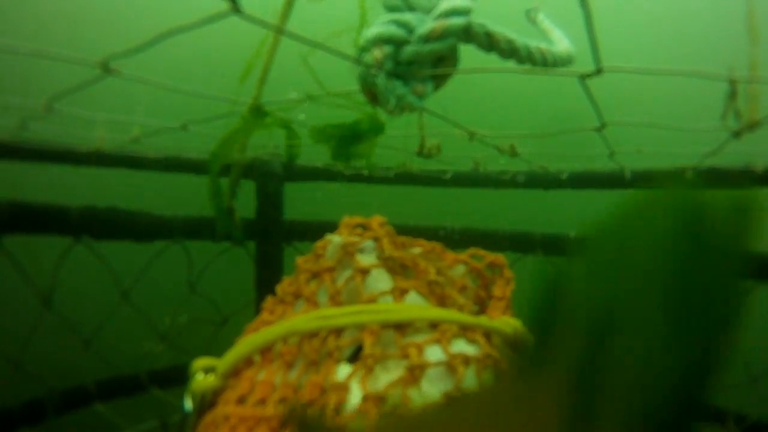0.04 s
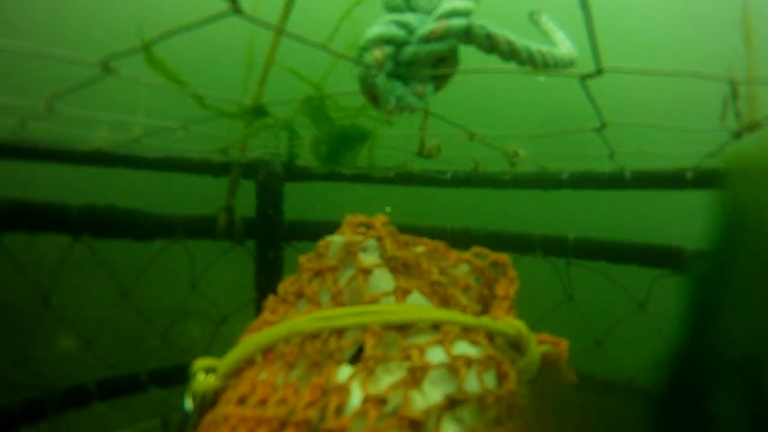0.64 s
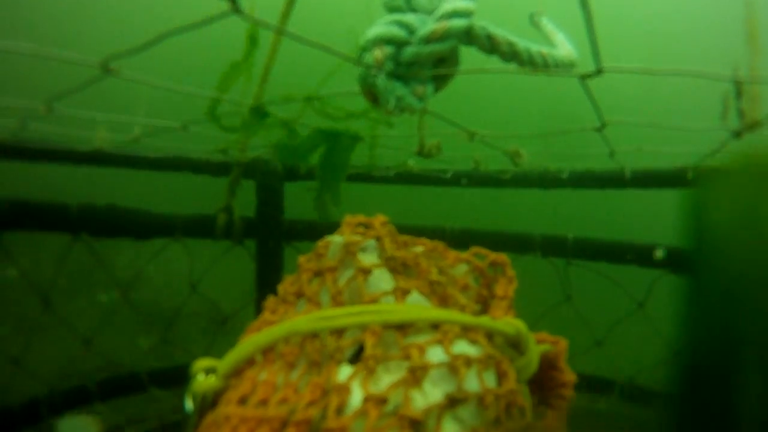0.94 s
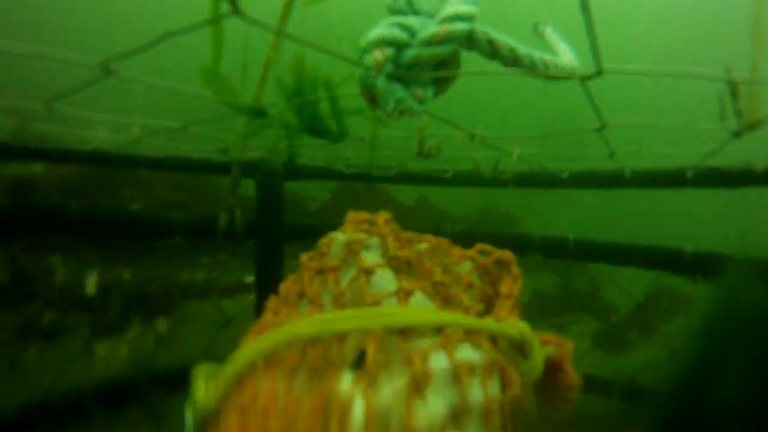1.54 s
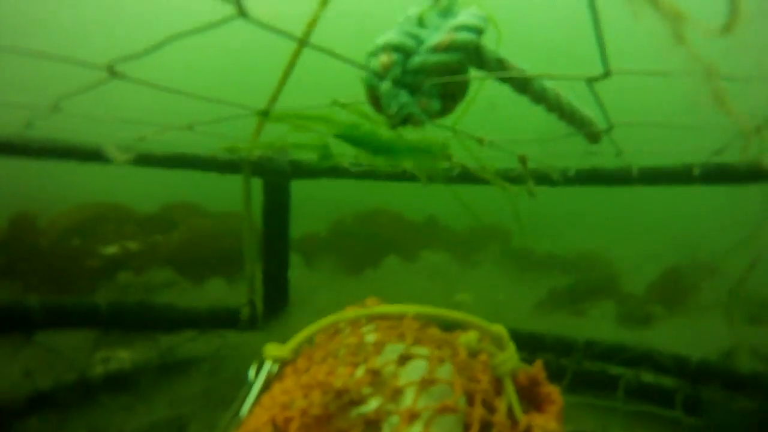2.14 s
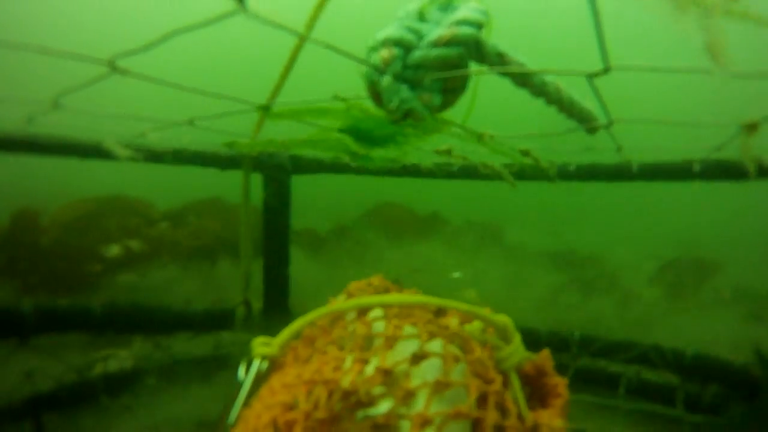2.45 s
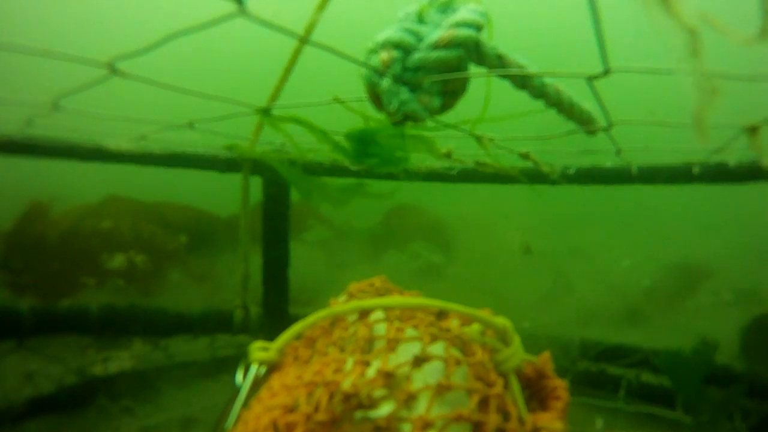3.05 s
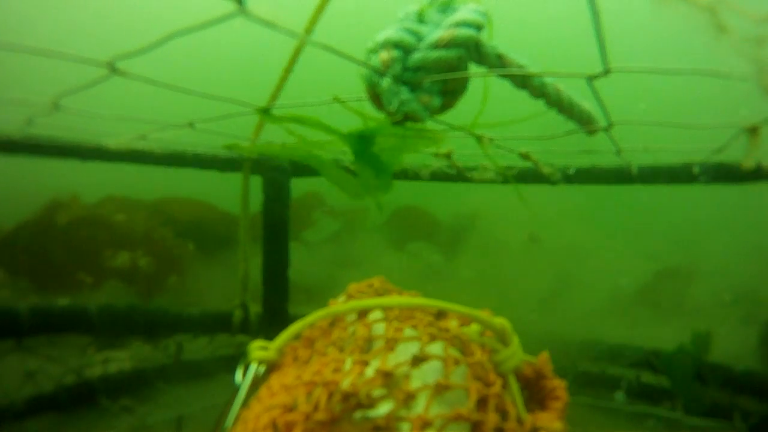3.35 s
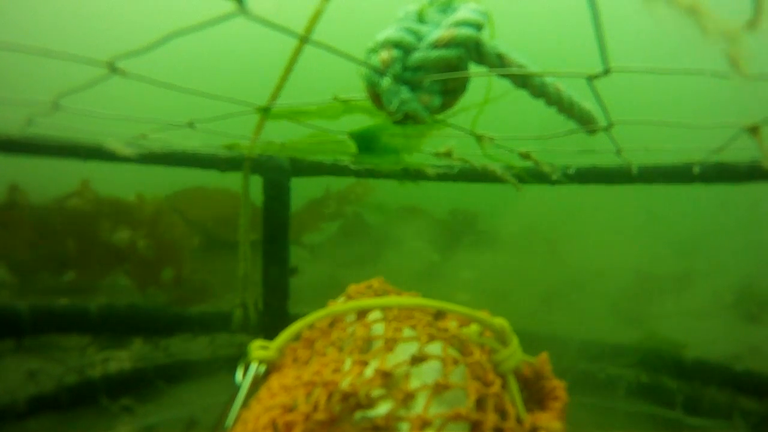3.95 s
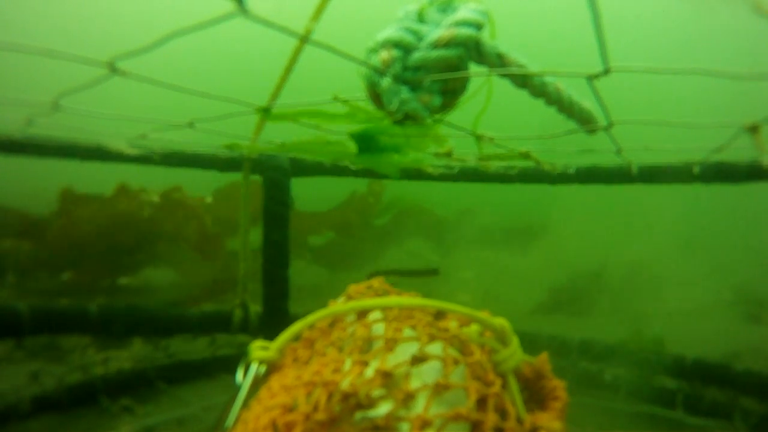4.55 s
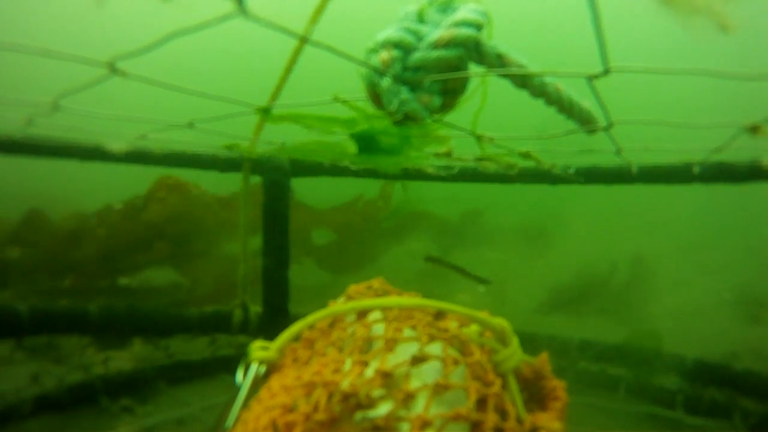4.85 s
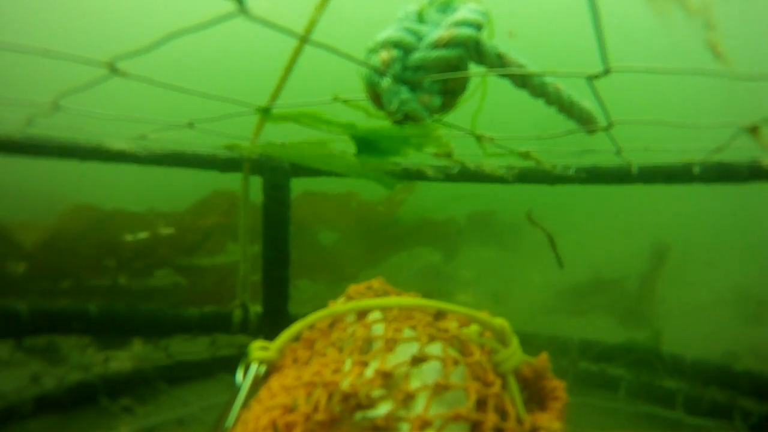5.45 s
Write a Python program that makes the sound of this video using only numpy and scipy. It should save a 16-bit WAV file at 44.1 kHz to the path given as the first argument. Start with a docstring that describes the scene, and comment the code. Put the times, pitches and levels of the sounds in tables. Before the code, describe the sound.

Heard underwater, a wire trap thuds and clatters onto a stony bottom over the low hum of an idling boat engine.

```python
"""A baited wire trap with a camera inside sinks while a boat's engine hums and clatters overhead.
On the way down, the seabed's echo sweeps a notch (a gap in pitch) upward through the clatter.
At about 1.7 s the frame lands with thuds, sharp clacks and a judder, then settles on crackling grit.
The engine idles on, fainter. Throughout, the camera samples slowly and holds each sample,
which mirrors the sound faintly into the treble."""
import sys
import numpy as np
from scipy import signal
from scipy.fft import rfft, irfft
from scipy.io import wavfile

SR = 44100
rng = np.random.default_rng(int(sys.argv[2]) if len(sys.argv) > 2 else 0)


def transcribe(u):
    """Save the signal u as a 16-bit wav file named by the first command-line argument.

    u: samples, shape (n,) or (channels, n), limited to [-1, 1]; the rate is SR.
    q: integer samples, one column per channel.
    """
    v = np.clip(np.atleast_2d(u).T, -1, 1)
    q = np.round(v * 32767).astype(np.int16)
    wavfile.write(sys.argv[1], SR, q)


N = 251370
TIME = np.arange(N) / SR
BIN_HZ = np.maximum(np.fft.rfftfreq(N, 1 / SR), 1)
LANDING_S, DRAG_END_S, CREEP_END_S = 1.66, 2.11, 2.62
STOPPING_S = 0.045  # how quickly the frame's movement dies away


def from_db(db):
    """Turn decibels into a factor to multiply by."""
    return 10 ** (np.asarray(db) / 20)


def rms_one(x):
    """Scale a sound to an average power of 1."""
    return x / np.sqrt(np.mean(np.abs(x) ** 2) + 1e-20)


def burst_one(x, length_s=0.0016):
    """Scale a burst to the energy of a short sine of height 1."""
    return x * np.sqrt(length_s * SR / 2 / np.sum(x ** 2))


def in_time(rows):
    """Join a table's timed points with straight lines, one curve per column."""
    times_s, *columns = np.transpose(rows)
    return [np.interp(TIME, times_s, column) for column in columns]


def swell(middle_s, length_s):
    """A smooth rise to 1 and fall around a moment."""
    return np.exp(-np.minimum((2 * (TIME - middle_s) / length_s) ** 2, 50))


def butter(x, hz, kind, order=2):
    """Keep the low part, the high part or one band of a sound."""
    return signal.sosfilt(signal.butter(order, hz, kind, fs=SR, output="sos"), x + 1e-18)


def noise(spectrum):
    """Noise of power 1, shaped by (pitch_hz, level_db) points."""
    hz, db = np.transpose(spectrum)
    gain = from_db(np.interp(np.log(BIN_HZ), np.log(hz), db))
    return rms_one(irfft(rfft(rng.standard_normal(N)) * gain, N))


def drift(rate_hz):
    """A smooth random wobble, about 1 in size."""
    return rms_one(butter(rng.standard_normal(N + SR), rate_hz, "low", order=3)[SR:])


def band(centre_hz, width_hz):
    """Noise of power 1, gathered around one pitch."""
    phase = 2 * np.pi * np.cumsum(np.full(N, centre_hz)) / SR
    return rms_one(drift(width_hz / 2) * np.cos(phase) + drift(width_hz / 2) * np.sin(phase))


def resonant_noise(modes):
    """Noise that rings around several pitches at once."""
    return sum(from_db(db) * band(hz, width_hz) for hz, width_hz, db in modes)


def ring(force, hz, fade_s):
    """Each click starts a tone that falls by 60 dB in fade_s."""
    decay, step = from_db(-60 / (fade_s * SR)), 2 * np.pi * hz / SR
    return signal.lfilter([0, np.sin(step)], [1, -2 * decay * np.cos(step), decay ** 2], force + 1e-18)


def push(t, hz):
    """The pressure of a soft blow: one peak between two dips."""
    spread = (np.pi * hz * t) ** 2
    return (1 - 2 * spread) * np.exp(-np.minimum(spread, 50))


def crunch(t, rise_s):
    """A contact breaks into many tiny slips within a few milliseconds."""
    return rng.standard_normal(len(t)) * (t / rise_s) * np.exp(1 - t / rise_s)


def hum_level(boat_db):
    """The main hum's level in dB flutters, and now and then swells or dips."""
    # brief swells and dips: middle_s, length_s, change_db
    surges = [(0.178, 0.095, -6), (0.424, 0.042, 3), (0.917, 0.082, 3.5), (1.232, 0.13, -6),
              (2.73, 0.23, -12.5), (2.992, 0.09, -22), (4.758, 0.056, -12), (4.847, 0.057, 5),
              (4.986, 0.075, -17), (5.247, 0.28, 3.5)]
    flutter_db = drift(rate_hz=7.4)
    return boat_db + flutter_db + sum(db * swell(s, length_s) for s, length_s, db in surges)


def engine_hum(firing_phase, boat_db, trim_db=0.5, waver_db=2.0):
    """The engine's firing makes a stack of wavering tones; the second is the main hum."""
    # engine tones: multiple of the firing rate, level_db
    tones = [(1, -13.5), (2, 0.5), (3, -16), (4, -19), (5, -23.5), (6, -33), (7, -31.5), (8, -27)]
    out = np.zeros(N)
    for multiple, db in tones:
        level_db = hum_level(boat_db) if multiple == 2 else boat_db + waver_db * drift(rate_hz=1.7)
        out += from_db(db + level_db) * np.sin(multiple * firing_phase + rng.uniform(0, 2 * np.pi))
    return np.sqrt(2) * from_db(trim_db) * out


def seabed_echo(x, echo_db=-4, sink_m_per_s=0.348, rest_height_m=0.051, sound_m_per_s=1500):
    """The echo returns ever sooner as the trap sinks, so the pitches it cancels slide upward."""
    height_m = rest_height_m + sink_m_per_s * np.maximum(LANDING_S - TIME, 0)
    delay_s = 2 * height_m / sound_m_per_s
    return x + from_db(echo_db) * np.interp(TIME - delay_s, TIME, x)


def engine_clatter(firing_phase, boat_db, clatter_db, wash_follows=0.55):
    """A low wash, a drone and three ringing bands of machine noise throb with each engine cycle."""
    # wash of engine noise in the water: pitch_hz, level_db
    wash_shape = [(20, -18.5), (34, -16.5), (44, 4), (65, 13.5), (110, 5.5), (170, 4), (235, -5.5),
                  (320, 1.5), (480, -2), (700, -8), (900, -23.5), (1100, -19), (2800, -24), (5600, -33)]
    # the boat's low drone comes and goes: middle_s, length_s, pitch_hz, level_db
    drone_swells = [(3.05, 1.3, 318.6, -52.5), (4.35, 0.32, 367.3, -48.5), (5.0, 3.3, 401.5, -55)]
    # ringing of the hull and of two higher bands: pitch_hz, width_hz, level_db
    hull_modes = [(612.4, 156, -8.5), (743.6, 137, -4.5), (831.5, 47.5, -5.5), (893, 29.3, -10.5),
                  (990, 62, -22.5), (1236, 81, -17.5)]
    middle_modes = [(1430, 222, -4.5), (1591, 200, -1.5)]
    upper_modes = [(2110, 310, -1.5), (2278, 80, -7), (2470, 78, -16.5), (3095, 190, -17.5),
                   (3570, 380, -14.5)]
    wash = from_db(-43.5 + wash_follows * (boat_db - boat_db.mean())) * noise(wash_shape)
    drone = sum(from_db(db) * swell(s, length_s) * band(hz, width_hz=59)
                for s, length_s, hz, db in drone_swells)
    hull = from_db(-46.5) * resonant_noise(hull_modes)
    middle = from_db(-52.5) * resonant_noise(middle_modes)
    upper = from_db(-55) * resonant_noise(upper_modes)
    throb = 1 + 0.087 * np.cos(firing_phase / 2) + 0.043 * np.cos(firing_phase)  # two firings a cycle
    return (wash + drone + from_db(clatter_db) * seabed_echo(hull + middle + upper)) * throb


def housing(force, scatter_db):
    """The camera's case rings at several pitches, a little differently wherever it is hit."""
    # the case's own tones: pitch_hz, level_db, fade_s
    modes = [(860, -15.5, 0.027), (1016, -16.5, 0.024), (1400, -12, 0.016), (1653.5, -10.5, 0.018),
             (2020, -5, 0.0069), (2373, -6.5, 0.016), (3405, -13, 0.011), (4500, -12, 0.00072)]
    return sum((-1) ** k * from_db(db + scatter_db * rng.standard_normal()) * ring(force, hz, fade_s)
               for k, (hz, db, fade_s) in enumerate(modes))


def damp_dead_spots(x):
    """Neighbouring tones of the case cancel at pitches between them."""
    # dead spots: pitch_hz, sharpness (higher is narrower)
    dead_spots = [(1140, 5.3), (2780, 26)]
    for hz, sharpness in dead_spots:
        x = signal.lfilter(*signal.iirnotch(hz, sharpness, fs=SR), x)
    return x


def ticks(rise_s=0.0013, low_hz=2350):
    """Two light touches snap and ring the case's higher tones."""
    # touches on the case: start_s, level_db, snap_db (compared with the ring)
    touches = [(0.3144, -31, -26), (4.8501, -33, -14)]
    out = np.zeros(N)
    for start_s, db, snap_db in touches:
        force = crunch(np.maximum(TIME - start_s, 0), rise_s)
        body = burst_one(butter(housing(force, scatter_db=5), low_hz, "high", order=4))
        snap = burst_one(butter(force, [3300, 5800], "band"))
        out += from_db(db) * (body + from_db(snap_db) * snap)
    return out


def frame_motion(rise_s=0.017, slowing_db_per_s=15, creep_db=-17):
    """The frame's speed over the seabed, about 1 on landing: a slowing drag and a longer, gentle creep."""
    age_s = np.maximum(TIME - LANDING_S, 0)
    drag = np.exp(-np.maximum(TIME - DRAG_END_S, 0) / STOPPING_S)
    creep = np.exp(-np.maximum(TIME - CREEP_END_S, 0) / STOPPING_S)
    onset = np.minimum(age_s / rise_s, 1)
    return onset * (from_db(-slowing_db_per_s * age_s) * drag + from_db(creep_db) * creep)


def grit(motion, level_db=-45.5, crackle_db=-10, grains_per_s=600, follows=1.21):
    """Small stones and shell crackle under the frame, thinning out as it settles."""
    # the frame digs in: middle_s, length_s, level_db (compared with full drag)
    digs = [(1.677, 0.022, 9), (1.836, 0.025, 6.5), (1.891, 0.025, 7)]
    rub = motion + sum(from_db(db) * swell(s, length_s) for s, length_s, db in digs)
    chance = np.maximum(grains_per_s * rub, 1) / SR
    sizes = rng.standard_normal(N) * (grains_per_s * rub > 1)
    grains = sizes * (rng.random(N) < chance) / np.sqrt(chance)
    body = rms_one(damp_dead_spots(housing(grains, scatter_db=0)))
    crackle = rms_one(butter(grains, [1800, 4200], "band"))
    return from_db(level_db) * rub ** follows * (body + from_db(crackle_db) * crackle)


def pebbles(motion, per_s=28, level_db=-31.5, spread_db=5, snap_db=-11, follows=0.88):
    """Small stones flick the mesh at uneven times, more softly as the frame comes to rest."""
    out, t = np.zeros(N), TIME[:SR // 32]
    for slot_s in np.arange(LANDING_S, CREEP_END_S + 2 * STOPPING_S, 1 / per_s):
        start = round((slot_s + rng.random() / per_s) * SR)
        force = crunch(t, rise_s=0.00069)
        body = burst_one(damp_dead_spots(housing(force, scatter_db=4.5)))
        snap = burst_one(butter(force, 3000, "high"))
        size = from_db(level_db + spread_db * rng.standard_normal()) * motion[start] ** follows
        out[start:start + len(t)] += size * (body + from_db(snap_db) * snap)
    return out


def landing(motion, rumble_db=-23):
    """The heavy frame thuds down and rumbles as it rocks to rest."""
    # the trap's weight meets the seabed: middle_s, level_db, pitch_hz
    blows = [(1.681, -8, 50.8), (1.686, -8.5, 117.6), (1.732, -14.5, 65), (1.831, -13, 129),
             (1.894, -10, 96)]
    thuds = sum(from_db(db) * push(TIME - s, hz) for s, db, hz in blows)
    rumble = noise([(8, -27), (22, 0), (42, 1.5), (70, -9.5), (140, -8.5), (260, -17.0),
                    (700, -38.5), (1500, -30.5), (5000, -89)])
    return thuds + from_db(rumble_db) * motion * rumble


def judder(first_s=1.8222, gap_s=0.00516, slowing=0.19, first_hz=440, softening=0.97):
    """A bar skips over a stone in four quick bumps that grow further apart, duller and weaker."""
    out, bump_s = np.zeros(N), first_s
    for k in range(4):
        level_db = -3.0 - 3.5 * k
        out -= from_db(level_db) * push(TIME - bump_s, first_hz / (1 + k * softening))
        bump_s += gap_s * (1 + k * slowing)
    return out


def clacks(wire_fade_s=0.0078, trim_db=-2.0, snap_trim_db=-3.0, low_hz=850):
    """Each hit on a stone snaps brightly and briefly rings the case and the wire that was struck."""
    # frame and mesh hit stones: start_s, level_db, wire_hz, snap_db (compared with the ring)
    hits = [(1.6751, -9.5, 1601, -33), (1.721, -10.5, 1730, -9), (1.7342, -16.5, 2200, -11),
            (1.744, -13, 2124, -7), (1.7538, 0, 2190, -28), (1.7706, -7.5, 2525, -7.5),
            (1.8305, -11.5, 2025, -36), (1.84, -12.5, 1430, -40), (1.8509, -14, 1556, -17.5),
            (1.8913, -2, 2360, -15), (1.905, -10, 1600, -9.5), (1.9202, -16, 1690, 0.5),
            (2.0096, -29.5, 1640, 0), (2.0393, -12.5, 1810, -38), (2.0542, -27, 1310, -26),
            (2.081, -9, 2120, -15.5), (2.0902, -20.5, 2110, -25), (2.106, -22, 1590, -17),
            (2.1958, -29, 2280, -22)]
    out, t = np.zeros(N), TIME[:SR // 16]
    for start_s, db, wire_hz, snap_db in hits:
        force = (t == 0) + 0.26 * crunch(t, rise_s=0.00056)  # one click, then tiny slips
        ringing = housing(force, scatter_db=4.5) + ring(force, wire_hz, wire_fade_s)
        body = burst_one(butter(damp_dead_spots(ringing), low_hz, "high"))
        snap = burst_one(butter(crunch(t, rise_s=0.00088), [2800, 5200], "band"))
        hit = body + from_db(snap_db + snap_trim_db) * snap
        start = round(start_s * SR)
        out[start:start + len(t)] += from_db(db + trim_db) * hit
    return out


def scene():
    """The engine above and the trap's landing, as they reach the camera."""
    # the idling speed wanders a little: time_s, hum_hz
    idle = [(0.3, 83.2), (0.8, 82.05), (2.2, 81.65), (2.45, 83.85), (3.4, 84.57), (3.8, 82.1),
            (4.25, 83.67), (5.1, 82.37), (5.7, 83.6)]
    # the boat grows fainter: time_s, boat_db (for the hum), clatter_db
    boat_fade = [(0, -27.5, -0.5), (2.3, -32.5, -0.5), (3.9, -37, -4), (5.7, -37.5, -6)]
    hum_hz, = in_time(idle)
    boat_db, clatter_db = in_time(boat_fade)
    firing_phase = 2 * np.pi * np.cumsum(hum_hz / 2) / SR
    engine = engine_hum(firing_phase, boat_db) + engine_clatter(firing_phase, boat_db, clatter_db)
    motion = frame_motion()
    return (engine + landing(motion) + judder() + clacks() + ticks() + grit(motion) + pebbles(motion))[None]


def record(dry, input_top_hz=5750, hold_hz=12000, output_top_hz=15450):
    """The camera holds each slow sample, which adds a faint mirror image in the treble; the top is cut."""
    narrow = signal.sosfilt(signal.ellip(8, .3, 60, input_top_hz, fs=SR, output="sos"), dry)
    mirrored = narrow * (1 + 2 * np.cos(2 * np.pi * hold_hz * TIME))
    held = irfft(rfft(mirrored) * np.sinc(BIN_HZ / hold_hz), N)
    return butter(held, output_top_hz, "low", order=20)


dry = scene()
out = record(dry)
transcribe(out)
```